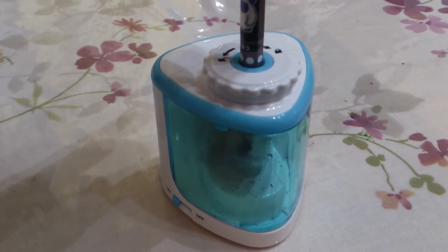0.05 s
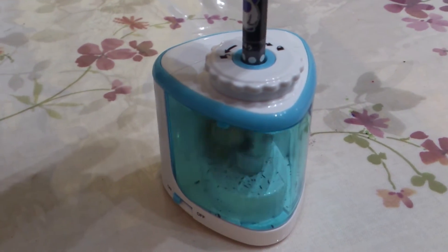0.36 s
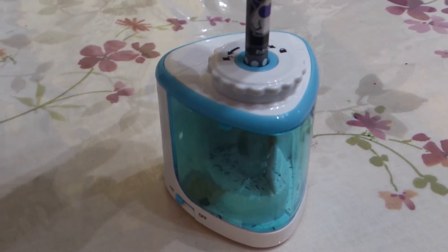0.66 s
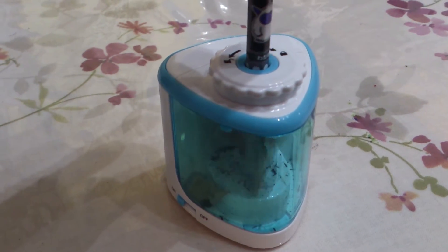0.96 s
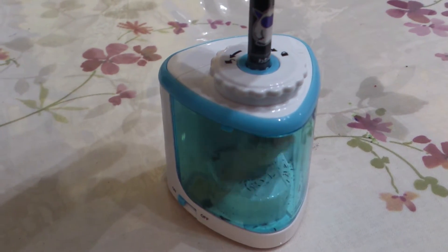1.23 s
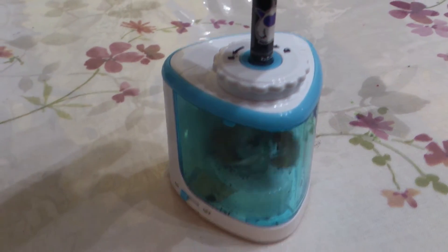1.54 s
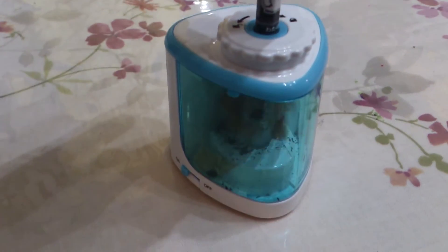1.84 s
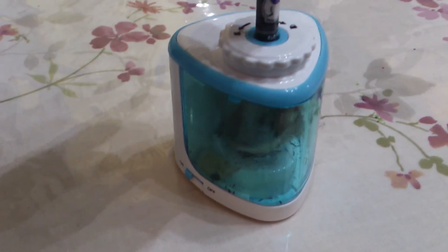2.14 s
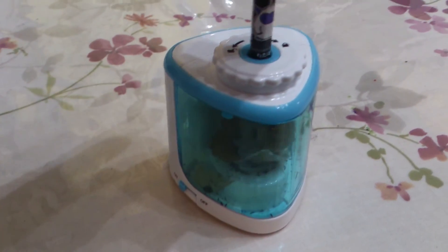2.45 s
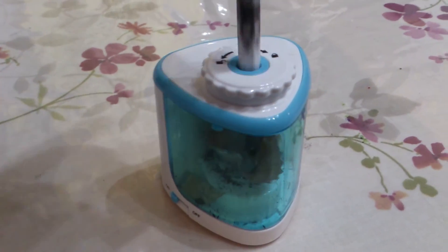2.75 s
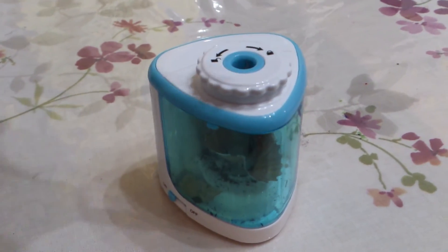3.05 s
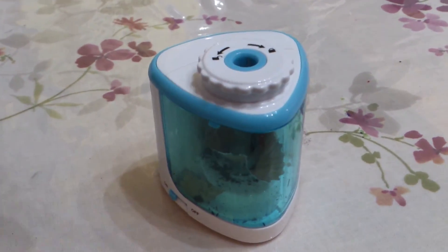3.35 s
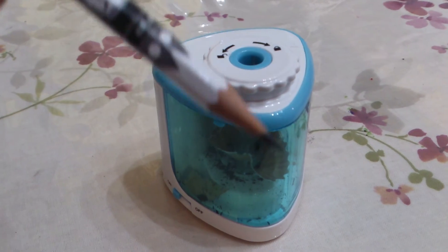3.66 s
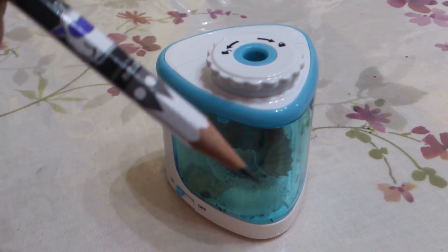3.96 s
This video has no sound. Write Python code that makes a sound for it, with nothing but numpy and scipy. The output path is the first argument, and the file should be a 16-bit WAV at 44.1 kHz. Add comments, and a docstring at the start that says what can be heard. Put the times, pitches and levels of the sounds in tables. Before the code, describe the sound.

A small electric pencil sharpener grinds with whining, clattering gears before winding down.

```python
"""A quiet room, one microphone close to a table where a small battery sharpener grinds a pencil. The motor
drives a ten-tooth pinion: the gears whine and clatter in the plastic case and sag as the blade bites, with one
sharp crack and a few fainter bright clicks. The pencil is eased out, the motor is cut, the gears rattle to a
stop, and the pencil is lifted away with a few faint touches."""
import sys
import numpy as np
from scipy import signal
from scipy.fft import rfft, irfft
from scipy.io import wavfile

SR = 44100
rng = np.random.default_rng(int(sys.argv[2]) if len(sys.argv) > 2 else 0)


def wav_record(signal):
    """Record a signal, one row per channel, as 16-bit PCM in the file named by sys.argv[1]."""
    frames = np.transpose(np.atleast_2d(signal))
    bounded = np.clip(frames, -1, 1)
    # unit amplitude maps onto the largest positive 16-bit level
    quanta = np.round(bounded * 32767).astype(np.int16)
    wavfile.write(sys.argv[1], SR, quanta)


N = 176400
T = np.arange(N) / SR
HZ = np.fft.rfftfreq(N, 1 / SR)

# motor speed, under load and then coasting (time [s], speed [turns/s])
MOTOR_SPEED = [(0, 242), (.22, 243.5), (.33, 235.5), (.45, 243.5), (.56, 226), (.64, 215), (.71, 229),
               (.77, 236.5), (.83, 231), (1.12, 235.5), (1.25, 239), (1.72, 243.5), (1.87, 251.5),
               (2.03, 254.5), (2.16, 261.5), (2.34, 250.5), (2.46, 261.5), (2.55, 185.5), (2.65, 134.5),
               (2.78, 77), (2.89, 51), (2.94, 1)]
PINION_TEETH, WHEEL_TEETH = 10, 32
CUT_S, COAST_FADE_DB_PER_S = 2.46, 167.5  # the motor is cut and the gear tones fade
POWERED, SINCE_CUT_S = T < CUT_S, np.maximum(T - CUT_S, 0)
FLUTTER_HZ, MESH_FLUTTER_DB = 19, 1.5
CASE_T60_S, CASE_RING_DB = 0.02, -5.5


def amp(db):
    """Decibels to gain."""
    return 10 ** (np.asarray(db) / 20)


def unit(x):
    """Scales to rms 1."""
    return x / np.sqrt(np.mean(x ** 2) + 1e-20)


def curve(points):
    """Joins (time [s], value) rows by straight lines."""
    return np.interp(T, *np.transpose(points))


def colour(x, points):
    """Filters x by (frequency [Hz], gain [dB]) rows."""
    hz, db = np.transpose(points)
    return irfft(rfft(x) * amp(np.interp(np.log(HZ + 1), np.log(hz), db)), N)


def drift(hz):
    """Random wander of rms 1, rolling off above hz."""
    return unit(irfft(rfft(rng.standard_normal(N)) / (1 + (HZ / hz) ** 4), N))


def sine(cycles):
    """A tone of rms 1 along a running phase."""
    return np.sqrt(2) * np.sin(2 * np.pi * cycles)


def narrow_noise(cycles, width_hz):
    """A narrow band of noise of rms 1 around a running phase."""
    phase = 2 * np.pi * cycles
    return unit(drift(width_hz) * np.cos(phase) + drift(width_hz) * np.sin(phase))


def ring(x, t60, wet_db):
    """Adds a dense, dying tail of reflections."""
    t = T[:SR // 2]
    tail = rng.standard_normal(len(t)) * amp(-60 * t / t60) * (t > .001)
    return x + amp(wet_db) * signal.fftconvolve(x, tail / np.linalg.norm(tail))[:N]


def bursts(rows, spectrum, decay_s):
    """Sudden, quickly dying bursts of noise from (time [s], onset level [dB]) rows."""
    envelope = sum(amp(db) * (T >= s) * np.exp(-abs(T - s) / decay_s) for s, db in rows)
    filter_gain = np.std(colour(signal.unit_impulse(N), spectrum)) * np.sqrt(N)
    return colour(envelope * rng.standard_normal(N), spectrum) / filter_gain


def motor_turns():
    """Angle of the motor shaft in turns; it wobbles, and slows a little at each bite of the blade."""
    blade_sag, turns_per_bite = .006, 17.7
    speed = curve(MOTOR_SPEED)
    bite = np.sin(2 * np.pi * np.cumsum(speed) / SR / turns_per_bite)
    speed *= 1 + .0025 * drift(hz=18) - blade_sag * bite
    return np.cumsum(speed) / SR + .003 * drift(hz=151)


def knocks(turns):
    """A gain that jumps once per turn of the shaft and of the wheel, then falls back."""
    decay_turns = 0.093
    wheel = turns * PINION_TEETH / WHEEL_TEETH
    return 1 + 0.89 * np.exp(-(turns % 1) / decay_turns) + 0.79 * np.exp(-(wheel % 1) / decay_turns)


def gear_whine(turns):
    """The meshing tone, a slow gear, and shaft multiples swayed by the off-centre wheel."""
    # tone of the meshing teeth (time [s], level [dB])
    mesh_level = [(0, -23), (.25, -22.5), (.5, -20.5), (.62, -17), (.73, -26.5), (.83, -19.5),
                  (1.12, -22.5), (1.6, -22), (1.72, -26.5), (1.8, -20.5), (2.05, -20.5), (2.18, -19),
                  (2.3, -23), (2.45, -23)]
    # gear tones (multiple of motor speed [ratio], relative level [dB])
    partials = [(4, -31), (5, -26), (6, -19.5), (6.75, -26), (7, -11.5), (8, -11), (8.75, -16.5), (9, -7),
                (11, -5.5), (12, -19.5), (13, -11.5), (14, -18.5), (15, -18), (16, -13.5), (17, -17),
                (18, -12), (19, -15.5), (21, -7), (22, -19), (23, -17), (26, -15), (27, -14), (28, -8.5),
                (30, -3.5), (32, -18.5), (37, -19), (39, -26)]
    # case panel resonances that lift those tones (frequency [Hz], half-width [Hz], lift [dB])
    panels = [(1790, 90, 6), (2267, 38, 7), (3130, 120, 8), (4300, 140, 8), (5116, 110, 4), (5200, 70, 4.5),
              (6550, 130, 7), (7250, 95, 6)]
    partials_db, wheel_sway, slow_gear_ratio = -24, .3, 1.44
    wheel, speed = turns * PINION_TEETH / WHEEL_TEETH, curve(MOTOR_SPEED)
    grid_hz = HZ[::20]
    panel_db = sum(db / (1 + ((grid_hz - hz) / width) ** 2) for hz, width, db in panels)
    mesh_db = curve(mesh_level) + MESH_FLUTTER_DB * drift(FLUTTER_HZ)
    out = amp(mesh_db) * sine(PINION_TEETH * turns + rng.random())
    out += amp(-57.5 + 3.7 * drift(FLUTTER_HZ)) * sine(slow_gear_ratio * turns + rng.random())
    for multiple, db in partials:
        sway = 1 + wheel_sway * np.sin(2 * np.pi * (wheel + rng.random()))
        flutter = unit(amp(drift(FLUTTER_HZ)) * sway)
        lift_db = np.interp(multiple * speed, grid_hz, panel_db)
        out += amp(partials_db + db + lift_db) * flutter * sine(multiple * turns + rng.random())
    return out * amp(-COAST_FADE_DB_PER_S * SINCE_CUT_S)


def tooth_strain(turns):
    """Hard-pressed teeth add the octave of the meshing tone, louder as the load slows the motor."""
    easy_speed_hz, load_db_per_hz, load_limit_db = 242, 1.8, 7
    load_db = np.minimum(load_db_per_hz * (easy_speed_hz - curve(MOTOR_SPEED)), load_limit_db)
    level_db = -32.5 + load_db + MESH_FLUTTER_DB * drift(FLUTTER_HZ) - COAST_FADE_DB_PER_S * SINCE_CUT_S
    return amp(level_db) * sine(2 * PINION_TEETH * turns)


def rotor_hum(turns):
    """The unbalanced rotor hums at the shaft rate, sliding down and fading as it coasts."""
    # hum under power (time [s], level [dB])
    hum_level = [(0, -42.5), (.25, -40.5), (.34, -46), (.48, -39), (.62, -59), (.85, -54), (1.1, -51.5),
                 (1.25, -43), (1.65, -39.5), (2.1, -44), (2.35, -40), (2.46, -48)]
    fade_db_per_s = 75.5
    return amp(curve(hum_level) - fade_db_per_s * SINCE_CUT_S) * sine(turns)


def tooth_clatter(turns):
    """Each uneven tooth strikes the next and rings the case, over the scrape of the blade."""
    # response of the plastic case (frequency [Hz], gain [dB])
    case_response = [(59, -56), (100, -30.5), (197, -40.5), (239, -22), (295, -26.5), (343, -16),
                     (406, -32), (621, -22.5), (872, -26.5), (1060, -24), (1310, -21.5), (1480, -11),
                     (1680, -14.5), (1870, -5.5), (2080, -6.5), (2750, -6.5), (3780, -0.5), (4110, -4),
                     (5190, -7.5), (5770, -10), (7290, 2.5), (8280, -4), (10700, -22), (13200, -21.5),
                     (16000, -30.5)]
    # bright clatter (time [s], level [dB])
    clatter_level = [(0, -15.5), (.6, -15), (1.1, -15), (1.6, -15.5), (1.75, -16.5), (2.0, -16.5),
                     (2.11, -18.5), (2.17, -16), (2.22, -18.5), (2.32, -16), (2.43, -18.5), (2.52, -24),
                     (2.64, -27), (2.74, -41), (2.83, -45), (2.92, -50), (2.98, -75), (3.08, -95)]
    slop_turns, wear_db, chance_db = .014, 5, 4.5
    scrape_share, cutter_hz = 0.45, 4.9
    loose_turns = turns + slop_turns * drift(hz=2500)
    tooth = np.maximum.accumulate(np.floor(loose_turns * PINION_TEETH)).astype(int)
    contact = np.diff(tooth, prepend=tooth[0]) > 0
    wear = wear_db * unit(rng.uniform(-1, 1, PINION_TEETH))
    chance = chance_db * np.clip(rng.standard_normal(N), -1.6, 1.6)
    strikes = contact * amp(wear[tooth % PINION_TEETH] + chance) * rng.choice([-1, 1], N)
    scrape = unit(rng.standard_normal(N) * knocks(turns))
    drive = np.sqrt(1 - scrape_share) * strikes / np.std(strikes[POWERED])
    drive += np.sqrt(scrape_share) * scrape
    grain_db = -0.79 * drift(hz=250)
    drive *= amp(0.05 * np.sin(2 * np.pi * cutter_hz * T) + grain_db)
    body = colour(ring(drive, CASE_T60_S, CASE_RING_DB), case_response)
    case_mode = amp(-14.5) * narrow_noise(7360 * T, width_hz=220)
    return (body / np.std(body[POWERED]) + case_mode) * amp(curve(clatter_level))


def slack_rattle(turns):
    """Slack gears knock with every turn, ever more slowly as they coast, and ring the housing."""
    # duller colour of the slack gears (frequency [Hz], gain [dB])
    slack_response = [(59, -46.5), (100, -13), (322, -31.5), (365, -17.5), (398, -24.5), (784, -27),
                      (1360, -5.5), (1910, 3.5), (2470, -3.5), (3620, 1.5), (4980, -15.5), (7450, -13),
                      (8830, -15.5), (10000, -31), (16000, -46.5)]
    # rattle, loudest just after the cut (time [s], level [dB])
    rattle_level = [(0, -42.5), (2.1, -25), (2.44, -24), (2.52, -23), (2.58, -22), (2.66, -26), (2.74, -29),
                    (2.8, -31), (2.88, -37), (2.915, -45.5), (2.98, -82)]
    drive = rng.standard_normal(N) * knocks(turns) ** 1.3 * amp(2 * drift(hz=120))
    body = colour(ring(drive, CASE_T60_S, CASE_RING_DB), slack_response)
    housing_mode = amp(-10.5) * narrow_noise(3805 * T, width_hz=110)
    return (body / np.std(body[POWERED]) + housing_mode) * amp(curve(rattle_level))


def table_rumble():
    """The casing shakes the table in proportion to the motor's speed."""
    # rumble of the casing on the table (frequency [Hz], gain [dB])
    spectrum = [(20, -33.5), (42, -27.5), (56, -4.5), (70, 1), (90, -16.5), (160, -10.5), (300, -23),
                (520, -29.5), (780, -14), (1100, -32), (2000, -50.5)]
    shake = curve(MOTOR_SPEED) / MOTOR_SPEED[0][1]
    return amp(-48.5) * unit(colour(rng.standard_normal(N), spectrum)) * shake


def room_tone():
    """Quiet room noise, faint steady tones and a thin high whistle."""
    # noise of the room (frequency [Hz], gain [dB])
    air_spectrum = [(15, -36), (25, -7), (84, 0), (270, -11.5), (384, -17.5), (451, -11), (560, -27.5),
                    (840, -20.5), (962, -24.5), (2000, -27), (2480, -16.5), (2760, -25.5), (4140, -21.5),
                    (5140, -26.5), (7510, -11.5), (8590, -19), (16000, -34.5)]
    # steady background tones (frequency [Hz], level [dB])
    steady_tones = [(59.2, -71.5), (441.4, -86), (834.4, -87.5), (2509, -86.5), (3101, -90.5)]
    air = amp(-67.5) * unit(colour(rng.standard_normal(N), air_spectrum))
    tones = sum(amp(db) * sine(hz * T + rng.random()) for hz, db in steady_tones)
    whistle = amp(-71.5) * narrow_noise(7400 * T, width_hz=70)
    return air + tones + whistle


def crack_and_clicks():
    """One sharp crack and four fainter, brief bright clicks."""
    # one sharp crack and fainter clicks (time [s], onset level [dB])
    cracks = [(0.429, -17.5), (.762, -7), (1.159, -17.5), (1.261, -16), (1.441, -16.5)]
    spectrum = [(300, -24), (1000, -18.5), (2000, -6), (8000, 1.5), (15000, -8)]
    return bursts(cracks, spectrum, decay_s=0.001)


def coasting_gears(turns):
    """Unloaded teeth bounce, so the meshing tone and its overtones blur as they fall."""
    # blurred tones (meshing harmonic [number], peak time [s], half-length [s], level [dB])
    swells = [(1, 2.48, 0.0811, -25.5), (2, 2.58, 0.056, -25), (3, 2.66, .05, -32)]
    tones = np.zeros(N)
    for harmonic, peak_s, half_s, db in swells:
        envelope = amp(db) * np.exp(-((T - peak_s) / half_s) ** 2)
        tones += envelope * narrow_noise(harmonic * PINION_TEETH * turns, width_hz=200)
    knocking = knocks(turns)
    return tones * knocking / np.mean(knocking[POWERED])


def last_ticks():
    """Single teeth catch and ring the case as the wheel comes to rest."""
    # catching teeth (time [s], onset level [dB])
    catches = [(2.623, -19), (2.652, -20.5), (2.704, -20), (2.736, -23), (2.768, -17.5), (2.781, -20.5),
               (2.828, -33)]
    spectrum = [(600, -24.5), (1800, 0.5), (3700, 0.5), (5500, -6), (7500, -2), (11000, -34.5)]
    return ring(bursts(catches, spectrum, decay_s=0.00193), CASE_T60_S, CASE_RING_DB)


def pencil_touches():
    """Pencil and fingers rub softly as the pencil is lifted away."""
    # faint rubs (peak time [s], half-length [s], level [dB], centre [Hz])
    rubs = [(2.997, .07, -64, 4200), (3.21, .025, -72, 2500), (3.335, .02, -69, 3600),
            (3.381, .02, -70, 1800), (3.44, .05, -73, 3000), (3.624, .03, -68, 4500)]
    out = np.zeros(N)
    for peak_s, half_s, db, hz in rubs:
        rub = colour(rng.standard_normal(N), [(hz / 4, -22), (hz, 0), (hz * 4, -22)])
        out += unit(rub) * amp(db) * np.exp(-((T - peak_s) / half_s) ** 2)
    return out


def scene():
    """The sharpener close up, in mono: its noises carry a short room tail, its tones stay dry."""
    turns = motor_turns()
    noises = tooth_clatter(turns) + slack_rattle(turns) + crack_and_clicks()
    noises += coasting_gears(turns) + last_ticks() + pencil_touches()
    in_room = ring(noises, t60=0.29, wet_db=-10.5)
    tones = gear_whine(turns) + tooth_strain(turns) + rotor_hum(turns)
    return (in_room + tones + table_rumble() + room_tone())[None]


def record(dry):
    """The microphone chain softly rounds the loudest peaks, then cuts the highest treble."""
    ceiling, edge_hz = 1.1, 15850
    rounded = dry / (1 + (dry / ceiling) ** 8) ** (1 / 8)
    lowpass = signal.firwin(511, edge_hz, window=("kaiser", 9), fs=SR)
    return signal.oaconvolve(rounded, lowpass[None], "same")


dry = scene()
out = record(dry)
wav_record(out)
```